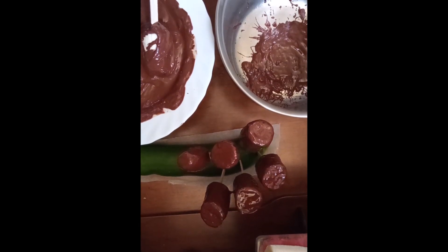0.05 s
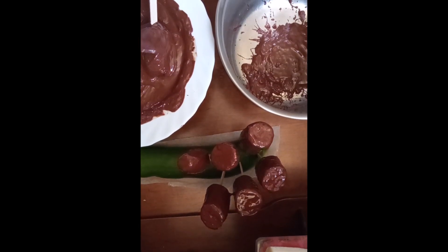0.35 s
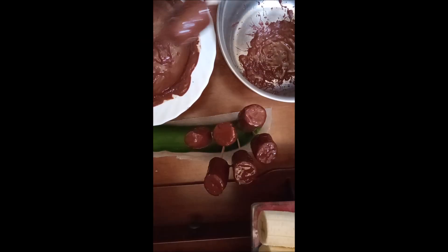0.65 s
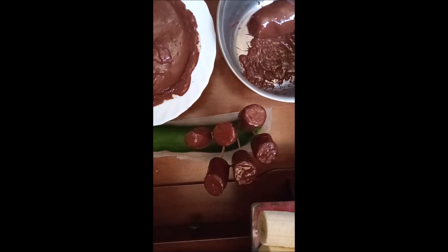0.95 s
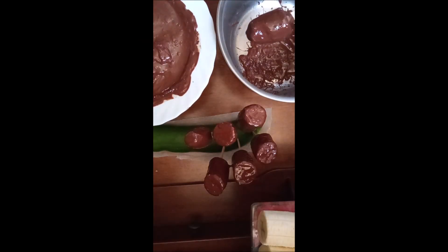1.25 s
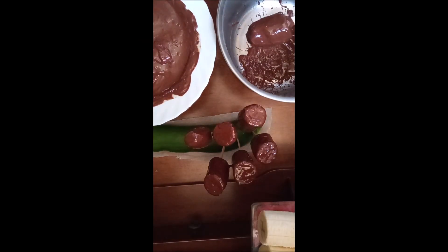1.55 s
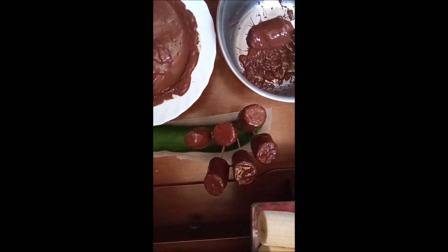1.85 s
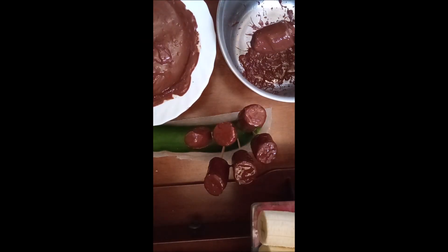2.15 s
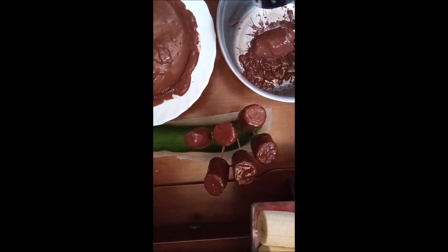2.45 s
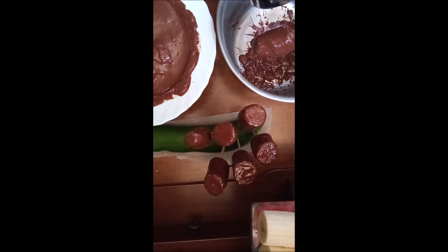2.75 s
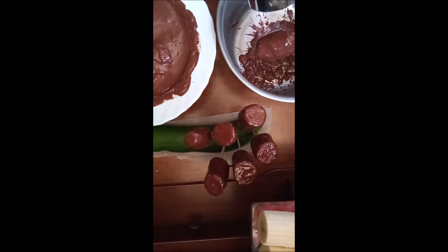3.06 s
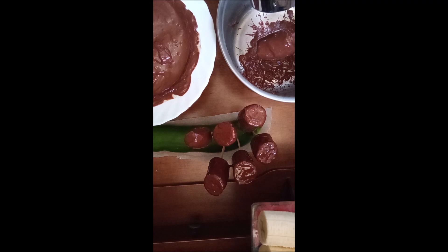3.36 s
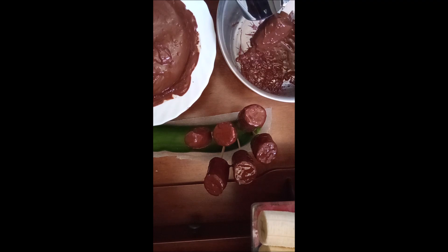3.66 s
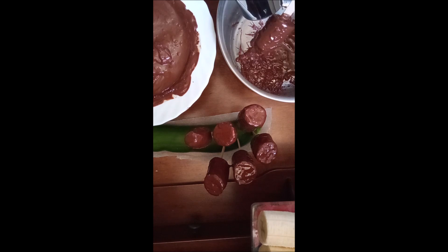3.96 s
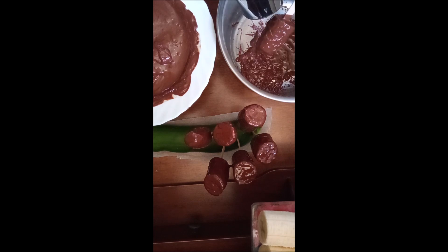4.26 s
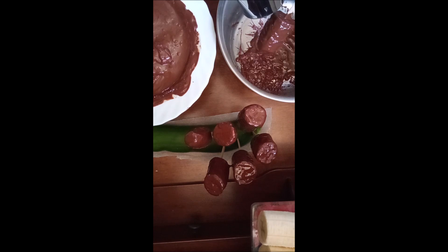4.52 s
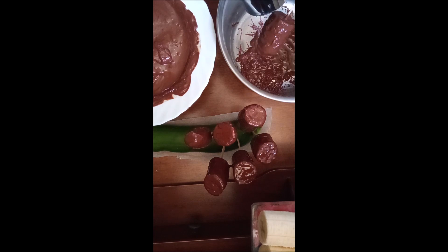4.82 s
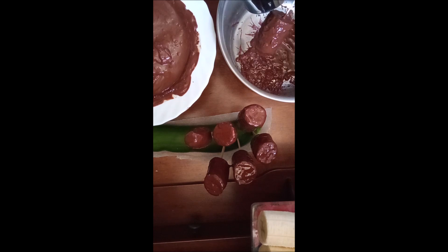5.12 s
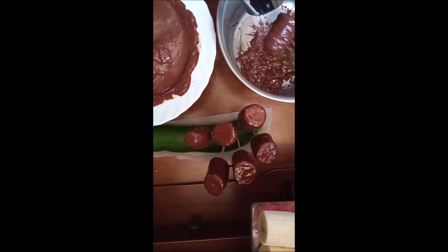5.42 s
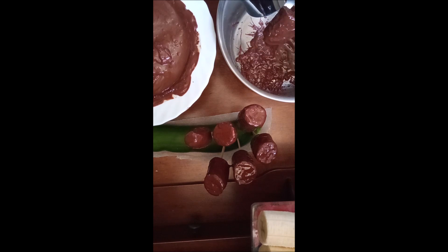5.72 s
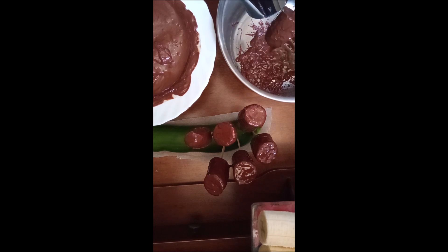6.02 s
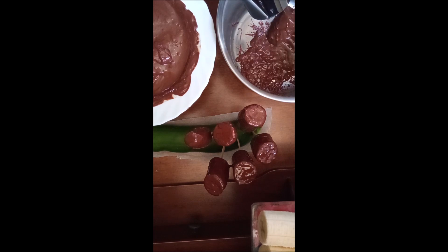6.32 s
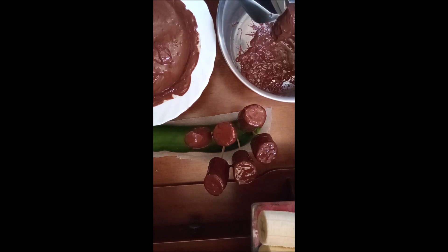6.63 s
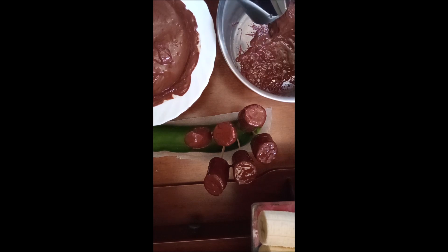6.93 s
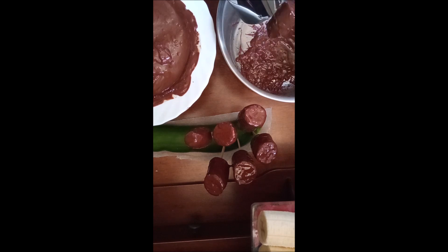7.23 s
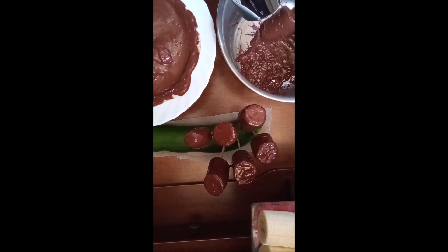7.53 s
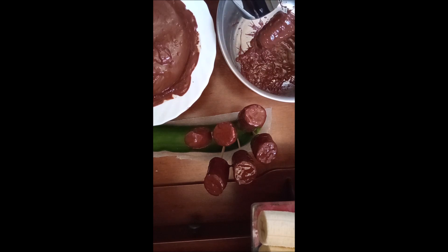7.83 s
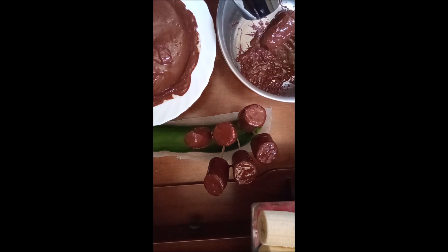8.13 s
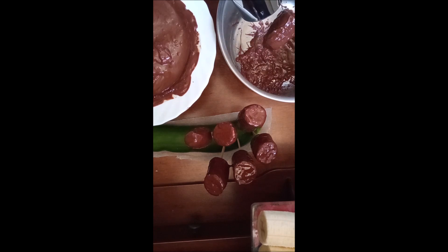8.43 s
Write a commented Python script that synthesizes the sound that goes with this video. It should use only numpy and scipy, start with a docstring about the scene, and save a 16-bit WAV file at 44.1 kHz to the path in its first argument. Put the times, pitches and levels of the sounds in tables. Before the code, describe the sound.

Five sharp plastic clicks, then a small electric blower starts up, rising quickly to a loud, even roar and hiss.

```python
"""A small electric blower motor runs close by in a kitchen. Its plastic switch and case click five times,
then the fan spins up and holds its speed. Swirling air makes a loud rush, the turning blades add
rough tones, and stray puffs of air thud on the microphone. Before the start, a hand rubs softly
on the case over quiet room air, a low hum and the faint whine of a far machine."""
import sys
import numpy as np
from scipy import signal
from scipy.fft import rfft, irfft
from scipy.io import wavfile

SR = 44100
rng = np.random.default_rng(int(sys.argv[2]) if len(sys.argv) > 2 else 0)


def master_out(mix):
    """Clip the mix to full scale and print it as 16-bit PCM to the path in sys.argv[1]."""
    frames = np.transpose(np.atleast_2d(mix))
    ceiling = np.clip(frames, -1, 1)
    pcm = np.round(ceiling * 32767).astype(np.int16)
    wavfile.write(sys.argv[1], SR, pcm)


N = 378378
TIME = np.arange(N) / SR
FREQS = np.maximum(np.arange(N // 2 + 1) * SR / N, 1)
ROTOR_HZ = 244.1  # turns per second at full speed
SETTLE_S = 3.665  # when the airflow settles

# Pitches at which the air duct rings: f/Hz, width/Hz, boost/dB
DUCT_RESONANCES = [(765, 84, 8.5), (980, 81, 5)]


def blower():
    """The fan spins up from the last click and runs on; the faster it turns, the louder the air."""
    # The rush sways a little: t/s, roar change/dB, hiss change/dB
    sway = [(3.7, -1.5, 0.6), (4.05, 0, -0.6), (4.42, -2, -0.8), (4.8, 0.1, -1), (5.3, 0.2, -0.5),
            (6.2, -1.4, -1.06), (6.9, 0, -0.14), (7.7, -1, 0), (8.3, -1.5, -0.5)]
    start_s, spin_up_s = 2.72, 0.335
    # The motor heads for 3% over full speed, but the load of the air holds it back.
    speed = np.clip(1.03 * (1 - np.exp((start_s - TIME) / spin_up_s)), 0, 1)
    unsettled = np.clip((SETTLE_S - TIME) / 0.02, 0, 1)  # falls from 1 to 0 as the flow settles
    grip = speed ** 6 / (speed ** 6 + 0.22 ** 6)  # the blades catch the air above 22% of full speed
    roar_sway, hiss_sway = in_time(sway)
    flutter_db = 0.6 * drift(16)
    roar = from_db(-27.5 + roar_sway + flutter_db) * speed ** 1.25 * grip
    hiss = from_db(-34 + hiss_sway - 0.5 * unsettled) * speed ** 2.82
    wobble = 0.002004 * drift(3.03) + 0.1094 * (1 - speed) * drift(35.1)  # ragged until full speed
    angle = 2 * np.pi * ROTOR_HZ * np.cumsum(speed * (1 + wobble)) / SR
    tones = rotor(angle) + eddies(angle)
    # Until the flow settles, the tones are weaker, the high ones most of all.
    low = lows(tones, 1000, steepness=12)
    tones = from_db(-2 * unsettled) * low + from_db(-7.5 * unsettled) * (tones - low)
    blades = roar * speed ** 4 * tones + howl(angle, speed) + duct()
    air = rush(roar, hiss) + whistle()
    # The middle of the rush also stays slightly hollow until then.
    middle = shaped(air, bell(FREQS, 1860, 1000))
    air = air + middle * (from_db(-unsettled * speed ** 4) - 1)
    return blades + air + speed * draught() + groan()


def rush(roar, hiss):
    """Swirling air rushes; the high hiss grows faster with speed than the low roar."""
    # Tone colour of rushing air: f/Hz, level/dB
    air_colour = [(30, -36), (60, -41), (130, -22.5), (260, -5.5), (370, -6.5), (480, 1), (700, 5.5),
                  (900, -2.5), (1500, -2), (3200, -6), (5200, -8.5), (8200, -15.5), (11500, -22),
                  (16000, -36.5)]
    # Fixed peaks and hollows in the tone of the rush: f/Hz, width/Hz, gain/dB
    rush_peaks = [(360.5, 14, 2.5), (490, 26, -8), (992, 36, 5), (1040, 20, -7), (1052, 31, 6),
                  (1110, 20, 1), (1253, 20, 6), (1311, 38, 7), (1826, 286, 4.5), (2072, 34, 5.5),
                  (2236, 32, 5), (2340, 840, 3.5), (2400, 23, 3), (3200, 120, -1.5), (3230, 30, 5.5),
                  (3555, 59, 6.5), (3770, 280, 4), (4187, 480, 5.5), (4680, 80, 3.5), (6580, 1470, 7.5),
                  (7150, 120, 1.5), (9670, 1830, 9), (15130, 1400, 15)]
    colour = from_db(at_hz(air_colour, FREQS) + peaks_db(rush_peaks, FREQS))
    air = rms_one(kitchen(noise(colour), wet_db=-12.5, gap_s=0.0042))
    body = lows(air, 810, steepness=4)
    return from_db(1) * roar * body + from_db(5) * hiss * (air - body)


def rotor(angle):
    """The turning rotor sings at multiples of its turning rate, roughened by the swirling air."""
    # Rotor tones: multiple of the turning rate, relative level/dB, roughness from 0 to 1
    rotor_tones = [(1, -19.5, 0.33), (3, -10, 0.57), (4, -11.5, 0.55), (4.69, -16.5, .6), (8, -16, 0.6)]
    tones = 0
    for multiple, db, rough in rotor_tones:
        clean = np.sqrt(2) * np.sin(multiple * angle + 0.45 * drift(3))
        ragged = narrow_noise(multiple * angle, width_hz=14)
        tones = tones + from_db(db) * (np.sqrt(1 - rough ** 2) * clean + rough * ragged)
    return shaped(tones, 1 / (1 + (190 / FREQS) ** 8))  # a small case gives off little bass


def eddies(angle):
    """The blades shed little whirls of air, whose rough pitches rise with the speed."""
    # Whirls at full speed: f/Hz, width/Hz, relative level/dB
    whirls = [(469.3, 29, -15), (532.7, 15, -9), (566.8, 23, -7), (598.4, 24, -10), (784.7, 48, -11),
              (953.6, 18, -12), (1149.6, 21, -13), (1193, 31, -16), (1737, 26, -18), (1809, 22, -21.5),
              (1903, 80, -16.5)]
    return sum(from_db(db) * narrow_noise(angle * hz / ROTOR_HZ, width) for hz, width, db in whirls)


def howl(angle, speed):
    """A ragged howl climbs as the blades speed up, and swells where it makes the duct ring."""
    # Howl bands: multiple of the turning rate, width/Hz, relative level/dB, power of speed they follow
    howl_bands = [(2.2, 70, -7.5, 0.96), (3.5, 130, -2, 3.9), (4.4, 126, -4, 0.43), (8.2, 90, -8, 3.6)]
    start_s, fade_db_per_s = 2.978, 10
    bands = sum(from_db(db) * speed ** power * narrow_noise(multiple * angle, width)
                for multiple, width, db, power in howl_bands)
    bands = shaped(bands, from_db(peaks_db(DUCT_RESONANCES, FREQS)))
    level = from_db(-30.5 - fade_db_per_s * (TIME - start_s))
    return level * until_settled(start_s, rise_s=0.036) * bands


def duct():
    """Unsettled air sets the duct moaning, and surges once on the way to full speed."""
    ringing = sum(from_db(db) * bell(FREQS, hz, width) for hz, width, db in DUCT_RESONANCES)
    moan = from_db(-44.5) * until_settled(start_s=2.86, rise_s=0.09) * noise(ringing)
    surge = from_db(-28) * bell(TIME, 3.383, 0.063) * noise(bell(FREQS, 920, 260))
    return moan + surge


def whistle():
    """The air outlet whistles: thin, breathy tones swell and fade."""
    # Whistles: middle t/s, length/s, f/Hz, width/Hz, level/dB
    whistles = [(6.75, 0.16, 6480, 260, -37), (7.1, 1.4, 6550, 400, -44.5), (6.88, .36, 2350, 120, -39.5),
                (7.21, 1.3, 2421, 14, -41), (7.35, .6, 2310, 70, -45), (7.3, 1.3, 4150, 480, -47)]
    return sum(from_db(db) * bell(TIME, s, length) * narrow_noise(2 * np.pi * hz * TIME, width)
               for s, length, hz, width, db in whistles)


def groan():
    """The motor groans in short, wavering spurts as it takes up the load."""
    # Groans: middle t/s, level/dB, f/Hz, length/s
    groans = [(2.662, -60, 646, 0.051), (2.741, -44, 635, 0.019), (2.806, -41.5, 635, 0.025),
              (2.83, -46, 700, .03), (2.872, -46.5, 760, 0.032), (2.945, -46, 640, .025)]
    return spurts(groans, 0.5 * drift(42))


def draught():
    """The fan's draught flutters on the microphone in small, random, low lumps."""
    rumble = noise(bell(FREQS, 157, 122))
    return from_db(-59) * rms_one(rumble * from_db(10 * drift(8.2)))


def puffs():
    """Stray air hits the microphone in short, low thuds."""
    # Thuds: middle t/s, level/dB, f/Hz, length/s
    thuds = [(3.26, -54, 120, 0.037), (3.555, -41, 105, 0.035), (3.632, -44, 85, 0.036),
             (4.462, -58.5, 75, 0.048), (4.853, -45.5, 150, 0.054), (5.878, -52, 95, 0.051),
             (6.522, -54, 125, 0.078), (7.657, -59, 110, 0.037)]
    return spurts(thuds, 1.06 * drift(41))


def clicks():
    """Each snap of the switch or case rings through the plastic; the hollow body adds dull knocks."""
    # Snaps: t/s, level/dB, treble tilt/(dB per octave), own pitch f/Hz, its boost/dB, amount of ring
    snaps = [(1.8363, -10, -0.5, 1520, 8.5, .55), (1.9909, -9.5, 0, 2380, 5, 0.76),
             (2.4454, -21.5, 1.5, 3500, 1, .6), (2.566, -3.5, .5, 6200, 2.5, 1.33),
             (2.7220, -6, -.5, 2330, 0, 1.05)]
    # Tone colour of the plastic: f/Hz, level/dB
    plastic = [(200, -28), (400, -14), (950, -13.5), (1500, -9.5), (2500, -4), (4000, -7), (5300, -7.5),
               (7000, -11.5), (8000, -16.5), (11000, -16), (13300, -22), (15000, -16)]
    # Pitches at which the hollow case rings: f/Hz, width/Hz, boost/dB
    case_ring = [(1730, 280, 1.5), (2340, 340, 6), (3250, 300, 6), (3870, 480, 5.5), (4850, 300, -1),
                 (6020, 910, 8), (9500, 1000, 9.5)]
    # Knocks: middle t/s, level/dB, f/Hz, length/s
    knocks = [(1.851, -55.5, 500, 0.0088), (1.9935, -41.5, 827, 0.003), (2.002, -50, 788, .009),
              (2.004, -53, 450, 0.0035), (2.026, -62, 680, .012), (2.575, -48.5, 425, 0.0065),
              (2.734, -53, 420, 0.012)]
    out = spurts(knocks, 0.4 * drift(60))
    size = 8192
    hz = np.maximum(np.arange(size // 2 + 1) * SR / size, 1)
    ring_db = peaks_db(case_ring, hz)
    for s, db, tilt_db, pitch_hz, boost_db, ring in snaps:
        slope_db = tilt_db * np.log2(np.maximum(hz, 1000) / 3000)
        pitch_db = boost_db * bell(hz, pitch_hz, width=490)
        colour = from_db(db + at_hz(plastic, hz) + ring * ring_db + slope_db + pitch_db)
        start = round(s * SR)
        out[start:start + size] += irfft(crack(size) * struck(colour), size)
    bass_cut = signal.butter(2, 230, "high", fs=SR, output="sos")  # the case is too small for deep bass
    return kitchen(signal.sosfilt(bass_cut, out), wet_db=-3.5, gap_s=0.0015)


def crack(size, chatter_s=0.0022):
    """Plastic parts chatter for an instant; gives the spectrum, evened out from low to high."""
    chatter = rfft(rng.standard_normal(size) * np.exp(-(TIME[:size] / chatter_s) ** 2))
    strength = np.abs(chatter)
    return from_db(3.5) * chatter * struck(1 / (strength + 0.15 * strength.mean()))


def rubs():
    """A hand shifts its grip on the plastic, making soft, short rubbing noises."""
    # Rubs: middle t/s, level/dB, f/Hz, width/Hz, length/s
    strokes = [(.01, -68, 2700, 1800, 0.091), (.01, -73, 3350, 350, .11), (.01, -68, 5870, 1600, 0.06),
               (1.44, -82, 2500, 4130, 0.18), (1.628, -79, 3740, 500, 0.039), (1.49, -91, 7100, 500, .06),
               (1.74, -84, 6400, 500, .025), (2.3, -84, 3500, 4000, 0.091), (2.33, -89, 9600, 1000, .15)]
    out, hz = np.zeros(N), np.arange(SR // 2 + 1)
    for s, db, centre_hz, width_hz, length in strokes:
        near = np.flatnonzero(np.abs(TIME - s) < 2 * length)[:SR]
        friction = rms_one(irfft(rfft(rng.standard_normal(SR)) * bell(hz, centre_hz, width_hz)))
        out[near] += from_db(db) * bell(TIME[near], s, length) * friction[:len(near)]
    return out


def kitchen(x, wet_db, gap_s):
    """Adds the kitchen's echo, which starts after a tiny gap and dies away band by band."""
    # Tone colour of the echo: f/Hz, level/dB
    walls = [(200, 1), (650, 4.5), (1200, 2), (2150, -4), (3900, 0), (7000, 1), (12600, 4)]
    # How long the echo lasts: f/Hz, time to fade by 60 dB/s
    fade_times = [(200, 0.12), (800, 0.28), (2000, 0.53), (5500, 0.43), (15000, 0.14)]
    t, tail = TIME[:SR // 2], 0
    edges_hz = np.geomspace(150, 17000, 9)
    for low, high in zip(edges_hz, edges_hz[1:]):
        hz = np.sqrt(low * high)
        band_filter = signal.butter(2, [low, high], "band", fs=SR, output="sos")
        band = signal.sosfilt(band_filter, rng.standard_normal(len(t)))
        tail = tail + band * from_db(at_hz(walls, hz) - 60 * t / at_hz(fade_times, hz))
    tail = tail * (t > gap_s) * (1 + 1.4 * np.exp(-t / 0.018))  # the table and bowls reflect first
    return x + from_db(wet_db) * signal.fftconvolve(x, tail / np.linalg.norm(tail))[:N]


def room_tone():
    """Quiet room air with a low, slightly wavering hum."""
    # Tone colour of the room air: f/Hz, relative level/dB
    air_colour = [(18, -21), (64, -19), (94, -11), (129, -2.5), (281, -18), (645, -14), (978, -20),
                  (1300, -18), (2560, -31.5), (8000, -43.5), (15000, -50)]
    # Hum tones: f/Hz, level/dB
    hum_tones = [(122.4, -73), (149.5, -80)]
    air = from_db(-73.5) * noise(from_db(at_hz(air_colour, FREQS)))
    hum = sum(from_db(db) * np.sqrt(2) * np.sin(2 * np.pi * hz * TIME + 0.34 * drift(4))
              for hz, db in hum_tones)
    return air + hum


def far_machine(base_hz=215.5):
    """A far machine whines: its overtones swell in turn, with a faint rasp underneath."""
    # Swells: multiple of the base pitch, middle t/s, length/s, level/dB
    swells = [(5, 0.38, 0.1, -74), (5, 0.62, 0.39, -76.5), (3, 0.81, 0.29, -74), (3, 1.24, 1, -77),
              (4, 1, 0.32, -72), (4, 1.55, 0.31, -74.5), (6, 1.36, 0.94, -78.5), (9, 0.83, 0.67, -88),
              (5, 2.37, 0.89, -71), (2, 0.83, 1, -85)]
    whine = 0
    for multiple, s, length, db in swells:
        level = from_db(db + 2.3 * drift(7)) * bell(TIME, s, length)
        whine = whine + level * narrow_noise(2 * np.pi * multiple * base_hz * TIME, width_hz=20.5)
    rasp = from_db(-77.5) * bell(TIME, 1.07, 1) * noise(bell(FREQS, 805, 350))
    return whine + rasp


def from_db(db):
    """Turns decibels into a number to multiply by."""
    return 10 ** (np.asarray(db) / 20)


def rms_one(x):
    """Scales a signal to an average strength (rms) of one."""
    return x / np.sqrt(np.mean(x ** 2) + 1e-20)


def in_time(rows):
    """Joins rows of (time, values) with straight lines, one curve per value column."""
    s, *columns = np.transpose(rows)
    return [np.interp(TIME, s, column) for column in columns]


def at_hz(points, hz):
    """Reads between rows of (frequency, value), with octaves evenly spaced."""
    known, values = np.transpose(points)
    return np.interp(np.log(hz), np.log(known), values)


def bell(x, centre, width):
    """A hump of height one, with the given width at half height."""
    return np.exp2(-np.minimum((2 * (x - centre) / width) ** 2, 200))


def peaks_db(rows, hz):
    """Adds up humps and dips along the frequency axis, in decibels."""
    return sum(db * bell(hz, centre, width) for centre, width, db in rows)


def until_settled(start_s, rise_s):
    """Rises, holds until the airflow settles, then dies away quickly."""
    rise = np.clip((TIME - start_s) / rise_s, 0, 1)
    return rise * np.exp(-np.clip((TIME - SETTLE_S) / 0.023, 0, 20))


def shaped(x, gain):
    """Turns each frequency up or down by its gain."""
    return irfft(rfft(x) * gain, N)


def lows(x, edge_hz, steepness):
    """Keeps the part of a sound below the edge."""
    return shaped(x, 1 / (1 + (FREQS / edge_hz) ** steepness))


def struck(gain):
    """A filter with these gains that rings only after it is hit (minimum phase)."""
    cepstrum = irfft(np.log(gain))
    half = len(cepstrum) // 2
    return np.exp(rfft(np.r_[cepstrum[0], 2 * cepstrum[1:half]], len(cepstrum)))


def noise(gain):
    """Noise of strength one, coloured by a gain per frequency."""
    return rms_one(shaped(rng.standard_normal(N), gain))


def drift(rate_hz):
    """A smooth random wander of about plus or minus one, as fast as the given rate."""
    spectrum = rfft(rng.standard_normal(16384))
    slow = irfft(spectrum * bell(np.arange(len(spectrum)) * SR / N, 0, 2 * rate_hz))
    return np.interp(TIME, np.linspace(0, N / SR, len(slow)), rms_one(slow))


def narrow_noise(phase, width_hz):
    """A rough tone, smeared at random over a narrow band of pitches."""
    rate_hz = width_hz / np.sqrt(2)
    return drift(rate_hz) * np.cos(phase) + drift(rate_hz) * np.sin(phase)


def spurts(rows, wander):
    """Short swelling tones, one per row, made to waver by the wander in their phase."""
    out = np.zeros(N)
    for s, db, hz, length in rows:
        near = np.abs(TIME - s) < 2 * length
        t = TIME[near]
        tone = np.sqrt(2) * np.sin(2 * np.pi * hz * t + wander[near])
        out[near] += from_db(db) * bell(t, s, length) * tone
    return out


def scene():
    """The blower, its handling and the room, the same in both channels."""
    handling = clicks() + rubs()
    return np.tile(blower() + puffs() + handling + room_tone() + far_machine(), (2, 1))


def record(dry):
    """The treble dips for an instant now and then, and the very top is cut off steeply."""
    # Middles of the treble dips: t/s
    dip_times = [3.19, 3.297, 4.32, 4.852, 5.512, 6.537, 6.731, 6.774, 6.88, 7.008, 7.114, 7.328, 7.54,
                 8.137]
    dip_db, ramp_s, cutoff_hz = -12.5, 0.013, 15850
    corners = [point for s in dip_times for point in ((s - ramp_s, 0), (s, dip_db), (s + ramp_s, 0))]
    low = lows(dry, 2400, steepness=4)
    dipped = low + (dry - low) * from_db(in_time(corners)[0])
    return shaped(dipped, np.clip((cutoff_hz - FREQS) / 100, 0, 1))


dry = scene()
out = record(dry)
master_out(out)
```